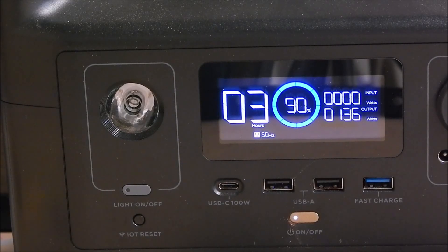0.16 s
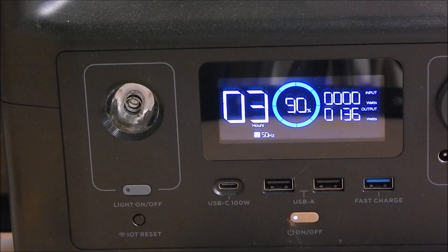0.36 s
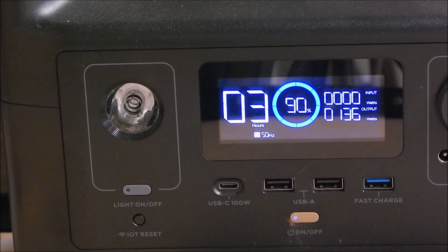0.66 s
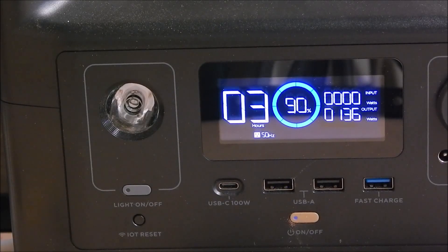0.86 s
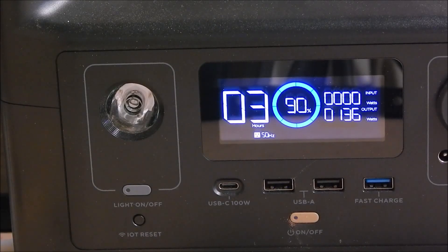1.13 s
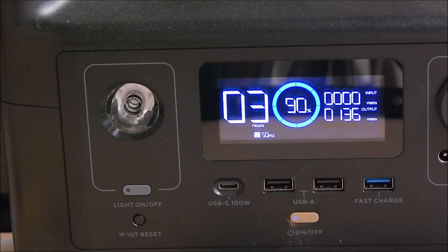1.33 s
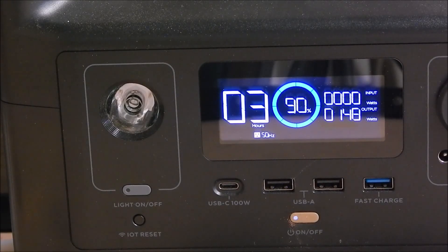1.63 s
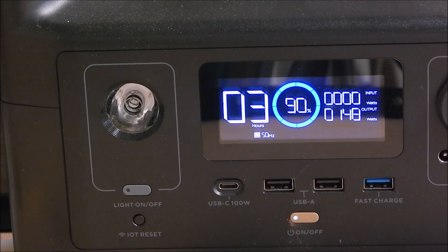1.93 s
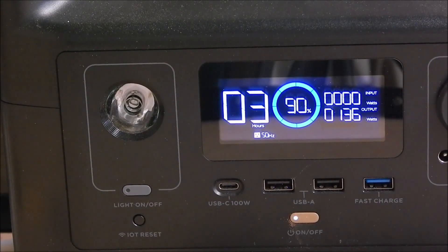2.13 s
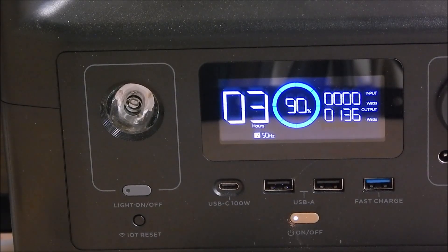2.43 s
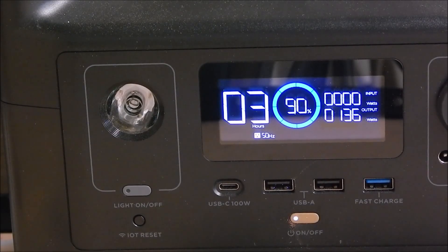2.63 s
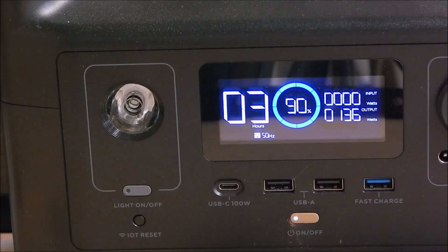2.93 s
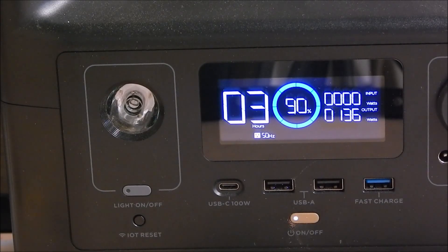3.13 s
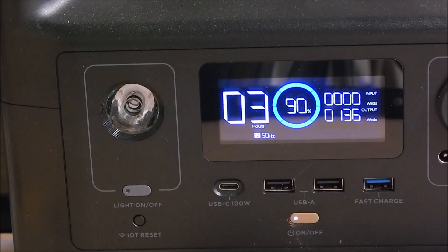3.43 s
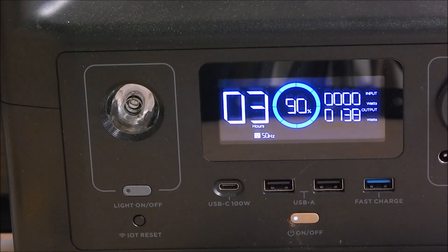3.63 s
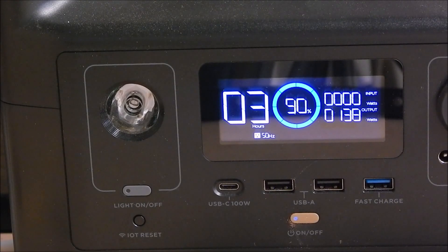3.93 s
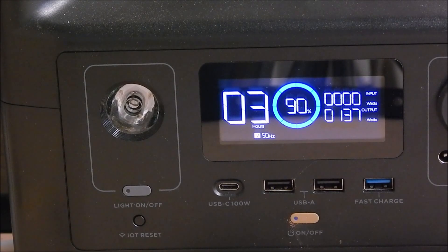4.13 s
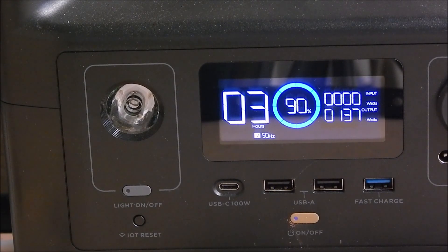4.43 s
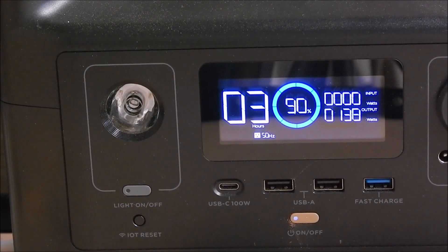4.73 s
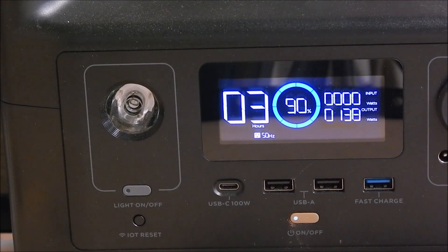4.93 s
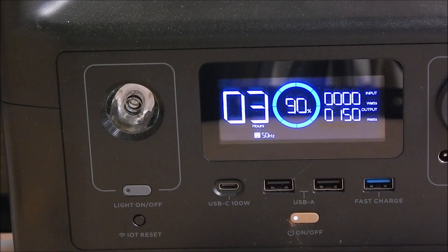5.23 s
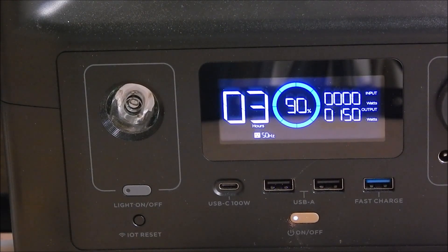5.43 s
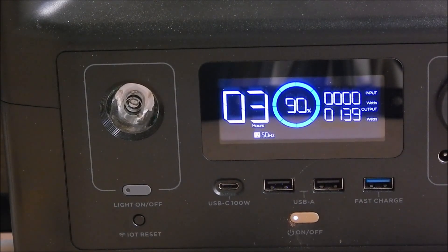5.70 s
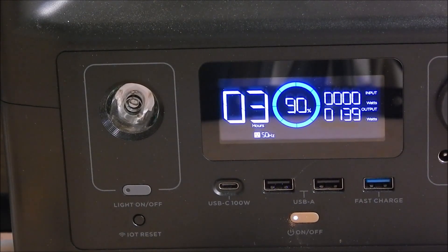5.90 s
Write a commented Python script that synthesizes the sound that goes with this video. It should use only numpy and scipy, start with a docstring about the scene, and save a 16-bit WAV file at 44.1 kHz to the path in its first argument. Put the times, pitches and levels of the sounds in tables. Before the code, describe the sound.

A fuel pump ticks evenly, each stroke a quick pair of knocks, over the quiet rush of air and low rumble of a small diesel heater. Soft, low puffs come and go, then grow stronger until the burner fires in two loud, deep, humming surges, with the pump still knocking. The microphone stands a short distance away in a small room.

```python
"""A blower rushes, and over it a dosing pump knocks about every 0.7 s: a small diesel heater is
lighting in a small room, a little way off. Each stroke, plunger in and plunger back, is a pair of
impacts that excite the modes of the pump, bracket and casing. The flame rumbles and puffs, then
catches twice and drives the burner pipe at resonance into a deep, surging drone."""
import sys
import numpy as np
from scipy import signal
from scipy.fft import rfft, irfft
from scipy.io import wavfile

SR = 44100
rng = np.random.default_rng(int(sys.argv[2]) if len(sys.argv) > 2 else 0)


def to_wav(s):
    """Save 16-bit WAV."""
    ch = np.atleast_2d(s).T  # columns
    pcm = np.round(np.clip(ch, -1, 1) * 32767)  # PCM
    wavfile.write(sys.argv[1], SR, pcm.astype(np.int16))


N = 267378
TIME = np.arange(N) / SR


def from_db(db):
    """Amplitude ratio of a level."""
    return 10 ** (np.asarray(db) / 20)


def unit_rms(x):
    """Normalisation to unit mean power."""
    return x / np.sqrt(np.mean(x ** 2) + 1e-20)


def at_hz(points, hz):
    """Interpolation of a spectrum on a log-frequency axis."""
    f, value = np.transpose(points)
    return np.interp(np.log(hz + 1e-3), np.log(f), value)


def drift(corner_hz):
    """Random fluctuation: low-passed Gaussian noise of rms 1."""
    hz = np.arange(N // 2 + 1) * SR / N
    return unit_rms(irfft(rfft(rng.standard_normal(N)) / (1 + (hz / corner_hz) ** 2), N))


def swell(centre_s, sigma_s):
    """Gaussian envelope of peak 1."""
    return np.exp(-.5 * ((TIME - centre_s) / sigma_s) ** 2)


def low_pass(x, hz):
    """Second-order roll-off, 12 dB per octave."""
    return signal.sosfilt(signal.butter(2, hz, fs=SR, output="sos"), x)


# Likeness of the sound at the two ears: f/Hz, coherence
COHERENCE = [(60, .985), (120, .96), (220, .95), (430, .84), (840, .58), (1600, .22), (3100, 0)]
# Left-right balance of air and flame noise: f/Hz, level difference/dB
AIR_BALANCE = [(150, 0), (1000, -.4), (2500, .5), (6000, .3), (8000, 2.4), (11000, 3)]
def room_noise(spectrum, balance=AIR_BALANCE, size=N):
    """Interaural coherence falls with frequency: stereo noise of rms 1, alike in the bass."""
    hz = np.arange(size // 2 + 1) * SR / size
    mid, side = np.exp(2j * np.pi * rng.random((2, len(hz))))
    coherence = at_hz(COHERENCE, hz)
    ears = np.array([[1], [-1]])
    pair = np.sqrt(1 + coherence) * mid + np.sqrt(1 - coherence) * side * ears
    level_db = at_hz(spectrum, hz) + ears * at_hz(balance, hz) / 2
    return unit_rms(irfft(pair * from_db(level_db), size))


def narrow_hiss(hz, width_hz):
    """Band-pass filtering: noise passed twice through one resonance; rms 1."""
    b, a = signal.iirpeak(hz, hz / width_hz, fs=SR)
    white = room_noise([(hz, 0)])
    return unit_rms(signal.lfilter(b, a, signal.lfilter(b, a, white)))


# Faint hisses and one soft scuff: t/s, Gaussian width/s, f/Hz, bandwidth/Hz, level/dB
WISP_BANDS = [(1.73, .045, 590, 180, -57.5), (1.72, .04, 1400, 600, -65), (2.44, .09, 3290, 180, -72),
              (3.31, .045, 7300, 900, -71)]
def wisps():
    """Amplitude modulation makes narrow bands of noise come and go."""
    return sum(from_db(db) * narrow_hiss(hz, width_hz) * swell(s, sigma_s)
               for s, sigma_s, hz, width_hz, db in WISP_BANDS)


# Rush of the blower: f/Hz, relative spectral level/dB
RUSH_SPECTRUM = [(40, -60), (150, -20), (215, -7), (280, 1), (400, -7), (550, -12.5), (800, -15.5),
                 (1100, -16.5), (1300, -19.5), (2100, -25.5), (3900, -27), (5400, -32.5), (8000, -32),
                 (11500, -31)]
# Narrow tones in the rush: f/Hz, bandwidth/Hz, level/dB
WHINE_BANDS = [(1110, 80, -69), (10900, 250, -83)]
def blower():
    """Flow noise: steady air through the ducts, fluttering a little, with a faint whine."""
    whine = sum(from_db(db) * narrow_hiss(hz, width_hz) for hz, width_hz, db in WHINE_BANDS)
    rush_db = -52 + .5 * drift(corner_hz=16)
    return from_db(rush_db) * room_noise(RUSH_SPECTRUM) + whine


# Modes of the pump, bracket and casing: f/Hz, relative level/dB, T60/s
BODY_MODES = [(114.9, -8, 0.51), (190.6, -19.5, 0.41), (251.3, -15, 0.34), (272.7, -12, 0.44),
              (301, -8, 0.28), (337.7, -15, 0.32), (407, -9.5, 0.063), (456, -15.5, 0.19),
              (502.3, -13.5, 0.21), (611.3, -17, 0.17), (719.6, -18, 0.19), (796, -22, 0.51),
              (865, -17.5, 0.16), (1014, -18.5, 0.3), (1403, -16, 0.13), (1508, -14, 0.05),
              (1630, -18, 0.063), (1813, -21.5, 0.17), (2020, -20, 0.14), (2200, -39, 0.099),
              (2300, -13, 0.077), (2660, -33.5, 0.31), (6960, -44, 0.11)]
# Dense clatter of a stroke: f/Hz, relative spectral level/dB
CLATTER_SPECTRUM = [(40, -35), (120, 0), (300, 4), (520, -4), (650, -9), (1000, -10), (1200, -14),
                    (2200, -12), (2550, -17), (4000, -18), (5400, -26), (7200, -23), (10000, -22),
                    (12000, -24)]
# Left-right balance of the clatter: f/Hz, level difference/dB
PUMP_BALANCE = [(300, 0), (2500, .3), (4200, 3), (6000, 2.5), (8000, 5), (12000, 5)]
def knock(ring_db, crack_db, crack_t60, room_db, room_t60, rise_s):
    """Impulse response to one blow: damped modes, a short clatter and the room's reverberation."""
    t = TIME[:SR // 2]
    ring = np.zeros((2, len(t)))
    for k, (hz, db, t60) in enumerate(BODY_MODES):
        # high modes reach the ears out of step
        ear_phase = rng.standard_normal() * hz / 1500 * np.array([[1], [-1]])
        ring += (-1) ** k * from_db(db - 60 * t / t60) * np.sin(2 * np.pi * hz * t + ear_phase)
    crack = from_db(crack_db - 60 * t / crack_t60) * room_noise(CLATTER_SPECTRUM, PUMP_BALANCE, len(t))
    room = from_db(room_db - 60 * t / room_t60) * room_noise(CLATTER_SPECTRUM, PUMP_BALANCE, len(t))
    attack = 1 - np.exp(-t / rise_s)
    return (from_db(ring_db) * ring + crack + room) * attack


# Strokes of the plunger: t/s, excitation level/dB
PUMP_STROKES = [(0.516, -33), (1.283, -33.5), (1.998, -33), (2.713, -34.5), (3.428, -34.5), (4.141, -34),
                (4.808, -34.5), (5.476, -33.5)]
def pump(return_s, jitter_s, return_db, return_top_hz, scrape_db, scrape_s, travel_s):
    """Impact excitation: the coil slams the plunger in, the spring returns it more softly."""
    pulls, returns = np.zeros((2, 1, N))
    friction = np.zeros(N)
    for s, db in PUMP_STROKES:
        back_s = s + return_s + jitter_s * rng.standard_normal()
        pulls[0, round(s * SR)] = from_db(db)
        returns[0, round(back_s * SR)] = from_db(db + return_db)
        # the plunger scrapes as it travels
        friction += from_db(db + scrape_db - 9 * np.abs(TIME - s - travel_s) / scrape_s)
    pull = knock(ring_db=1.5, crack_db=-6.5, crack_t60=.067, room_db=-12, room_t60=.37, rise_s=.0021)
    back = knock(ring_db=-.5, crack_db=.5, crack_t60=.062, room_db=-3.5, room_t60=.26, rise_s=.0028)
    knocks = signal.fftconvolve(pulls, pull) + signal.fftconvolve(returns, low_pass(back, return_top_hz))
    return knocks[:, :N] + friction * room_noise(CLATTER_SPECTRUM, PUMP_BALANCE)


# The low flame: f/Hz, relative spectral level/dB
RUMBLE_SPECTRUM = [(8, -34), (20, -7), (35, -6), (55, 7), (68, 4), (90, 3.5), (112, -0.5), (130, -1),
                   (155, -0.5), (195, -3), (270, -10), (800, -69)]
def rumble():
    """Combustion noise of a low flame burning evenly."""
    return from_db(-50) * room_noise(RUMBLE_SPECTRUM)


# The surging flame, coloured by the casing: f/Hz, relative spectral level/dB
ROAR_SPECTRUM = [(10, -29), (25, -24), (50, -1), (110, 11.5), (135, -8), (185, -0.5), (215, -7), (229, 3.5),
                 (320, -3.5), (500, -13), (660, -9), (1050, -23.5), (1500, -25.5), (5000, -80)]
def roar(drive, phase, level_db, exponent, throb_depth):
    """Turbulence grows as a power of the pipe's amplitude and throbs once a cycle."""
    throb = 1 + throb_depth * np.sin(phase)
    return from_db(level_db) * drive ** exponent * throb * room_noise(ROAR_SPECTRUM)


# Pockets of fuel flaring: t/s, level before filtering/dB, Gaussian width/s, cutoff f/Hz
FUEL_FLARES = [(5.076, -29, 0.018, 300), (5.193, -34.5, 0.028, 900)]
def flares():
    """Transient combustion: each pocket of fuel goes up with a soft thump."""
    return sum(from_db(db) * swell(s, sigma_s) * low_pass(room_noise(ROAR_SPECTRUM), top_hz)
               for s, db, sigma_s, top_hz in FUEL_FLARES)


# Puffs that briefly sound the pipe: t/s, Gaussian width/s, f/Hz, peak level/dB
FLAME_PUFFS = [(0.732, 0.021, 65.9, -42.5), (0.857, 0.051, 65.1, -43.5), (1.0, .016, 75, -45),
               (1.109, 0.023, 75.1, -39.5), (1.239, 0.038, 75.2, -49), (3.131, 0.049, 56, -50),
               (3.321, 0.039, 56, -48), (3.97, .08, 68, -48), (4.305, .02, 72, -39),
               (4.429, .03, 69.83, -43), (4.55, .028, 72.9, -36.5), (5.512, .022, 68.02, -39)]
# Surges that hold the pipe sounding, one curve each: t/s, f/Hz, level/dB
FLAME_SURGES = [
    [(4.64, 70.64, -39.5), (4.77, 72.52, -22.5), (4.86, 73.98, -21), (4.93, 72.6, -26.5),
     (5.075, 72.9, -21), (5.105, 74.3, -27), (5.18, 76.92, -20), (5.3, 75.93, -24.5), (5.45, 66.97, -37)],
    [(5.66, 70, -37.5), (5.79, 69.33, -33), (5.89, 72.9, -20.5), (5.99, 71.86, -25.5), (6.06, 69.1, -31)],
]
def pipe_oscillation(fade_s):
    """Flame-driven resonance: frequency and amplitude of the pipe; the strongest swing sets the pitch."""
    pitches = [np.full(N, hz) for _, _, hz, _ in FLAME_PUFFS]
    swings = [from_db(db) * swell(s, sigma_s) for s, sigma_s, _, db in FLAME_PUFFS]
    for surge in FLAME_SURGES:
        s, hz, db = np.transpose(surge)
        inside_s = np.minimum(TIME - s[0], s[-1] - TIME)
        burning = np.clip(1 + inside_s / fade_s, 0, 1)
        pitches.append(np.interp(TIME, s, hz))
        swings.append(from_db(np.interp(TIME, s, db)) * burning)
    swings = np.array(swings)
    return np.average(pitches, axis=0, weights=swings + 1e-12), swings.sum(axis=0)


# Pipe overtones at full drive, before the casing colours them: harmonic number, relative level/dB
PIPE_HARMONICS = [(2, -21), (3, -21.5), (4, -26), (5, -26.5)]
def drone(hz, drive, phase, waver_db):
    """Nonlinear oscillation: the overtones grow as the square of the fundamental's amplitude."""
    right_ear_lag_rad = .16
    tone = drive * np.sin([phase, phase - right_ear_lag_rad])
    for order, db in PIPE_HARMONICS:
        casing_db = at_hz(ROAR_SPECTRUM, order * hz)   # an overtone swells where it meets a resonance
        overtone_db = db + casing_db + waver_db * drift(corner_hz=6)
        tone += drive ** 2 * from_db(overtone_db) * np.sin(order * phase)
    return tone


def burner(full_db, sputter_db):
    """Thermoacoustic coupling: the flame locks onto the pipe's resonance, droning and roaring with it."""
    hz, amplitude = pipe_oscillation(fade_s=.038)
    phase = 2 * np.pi * np.cumsum(hz) / SR
    drive = amplitude / from_db(full_db) + 1e-12
    weakness = np.clip(1 - drive, 0, 1)   # a weak flame sputters, a strong one holds
    drive *= from_db(sputter_db * weakness * drift(corner_hz=18))
    pipe = np.sqrt(2) * from_db(full_db) * drone(hz, drive, phase, waver_db=2.5)
    return pipe + roar(drive, phase, level_db=-38.5, exponent=.64, throb_depth=.49)


def scene():
    """Superposition of pump, flame and moving air."""
    knocks = pump(return_s=.047, jitter_s=.0007, return_db=-5, return_top_hz=2870,
                  scrape_db=-7.5, scrape_s=.0065, travel_s=.0037)
    flame = burner(full_db=-19, sputter_db=2.5) + rumble() + flares()
    return knocks + flame + blower() + wisps()


def record(dry):
    """Band limiting: a steep low-pass removes the treble above 12 kHz."""
    return signal.sosfilt(signal.ellip(12, .1, 80, 12000, fs=SR, output="sos"), dry)


dry = scene()
out = record(dry)
to_wav(out)
```